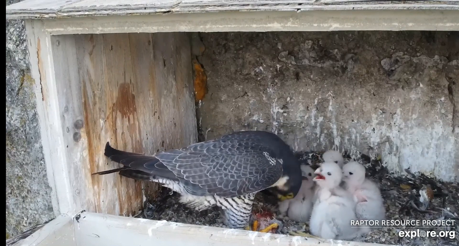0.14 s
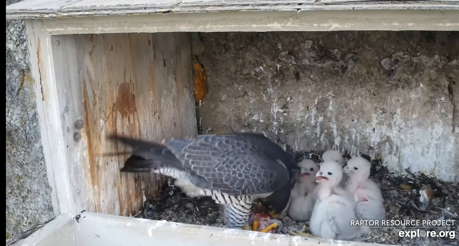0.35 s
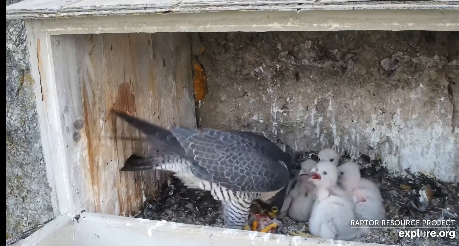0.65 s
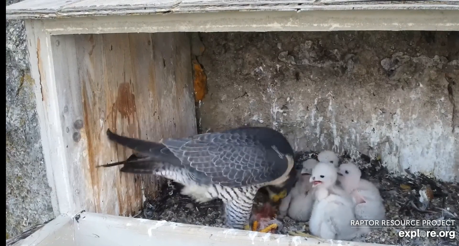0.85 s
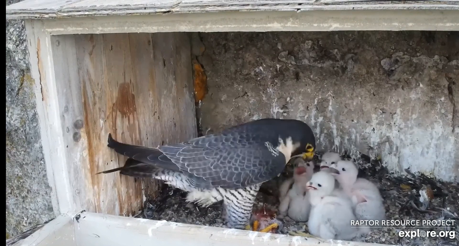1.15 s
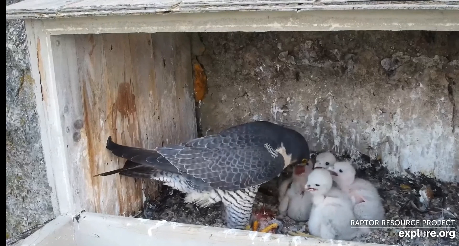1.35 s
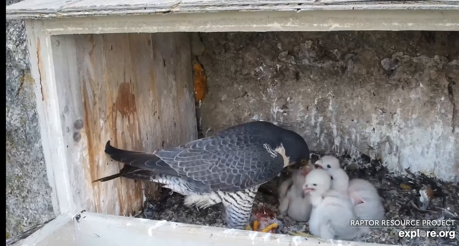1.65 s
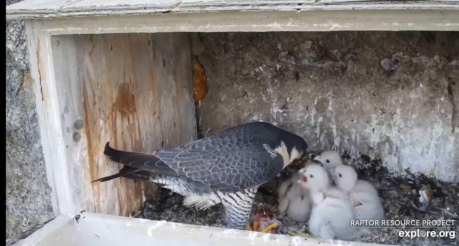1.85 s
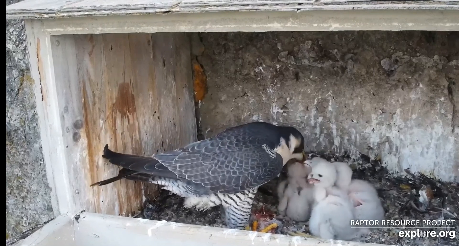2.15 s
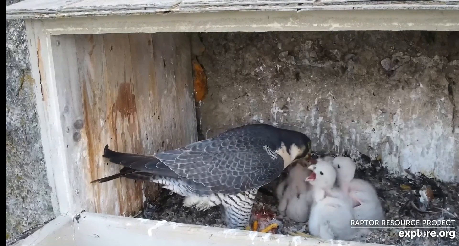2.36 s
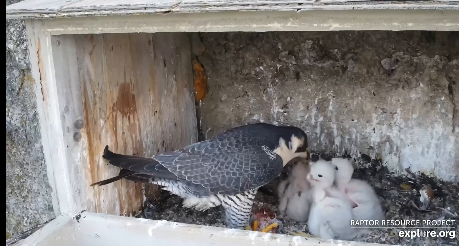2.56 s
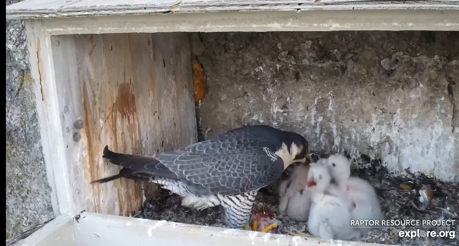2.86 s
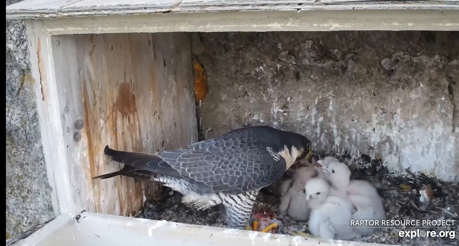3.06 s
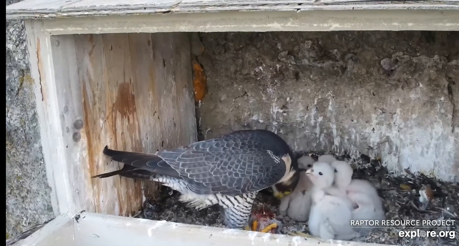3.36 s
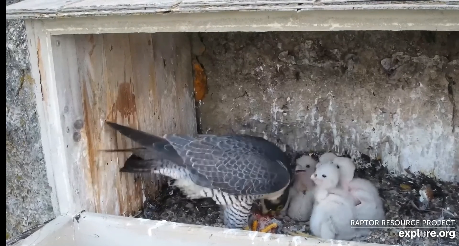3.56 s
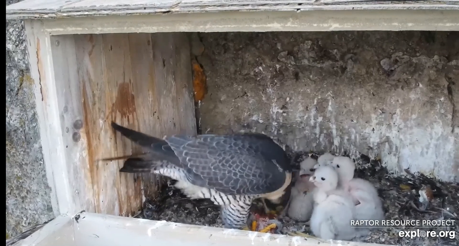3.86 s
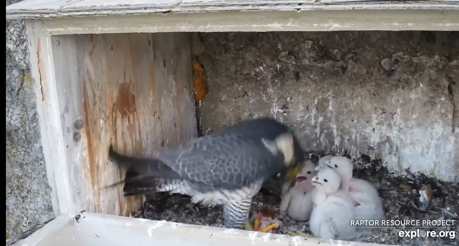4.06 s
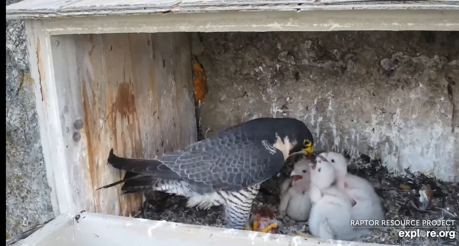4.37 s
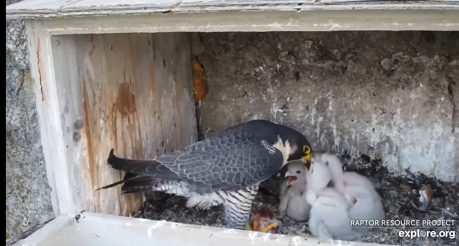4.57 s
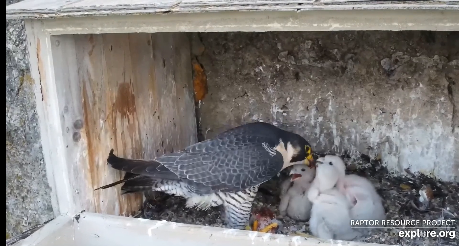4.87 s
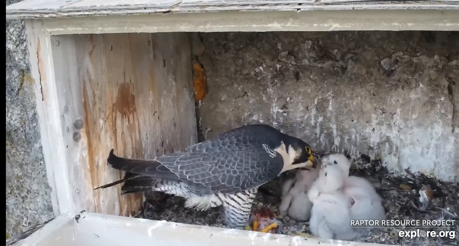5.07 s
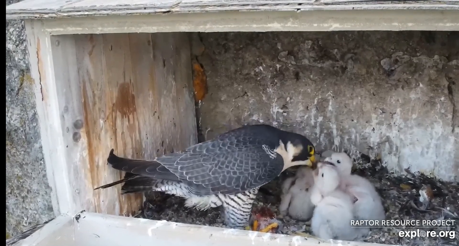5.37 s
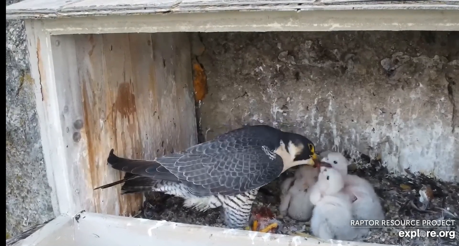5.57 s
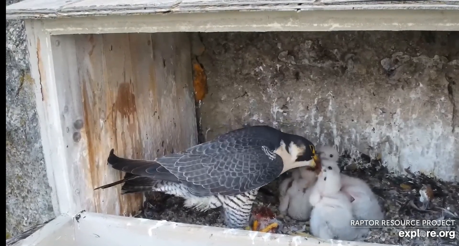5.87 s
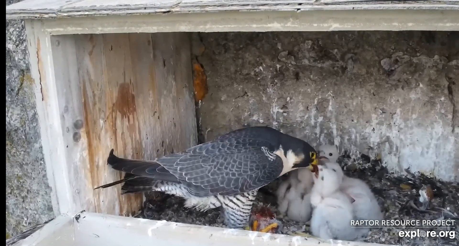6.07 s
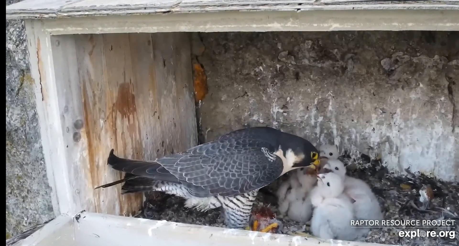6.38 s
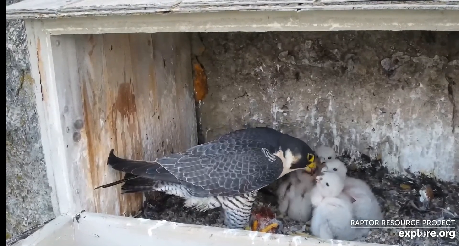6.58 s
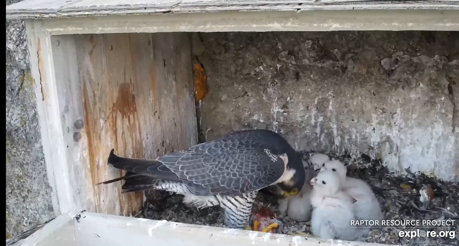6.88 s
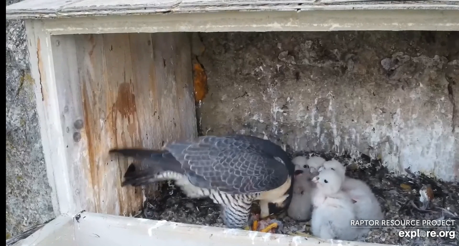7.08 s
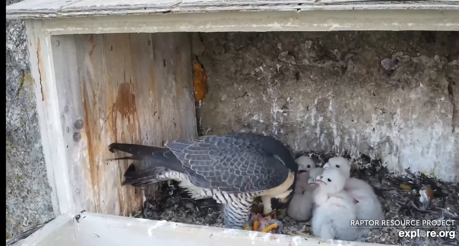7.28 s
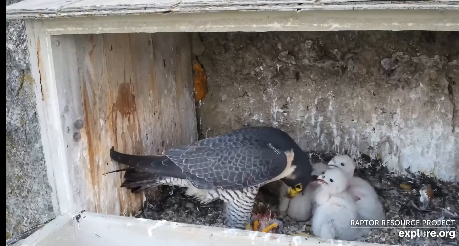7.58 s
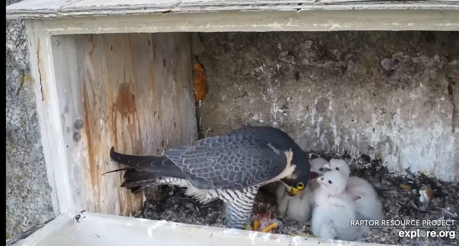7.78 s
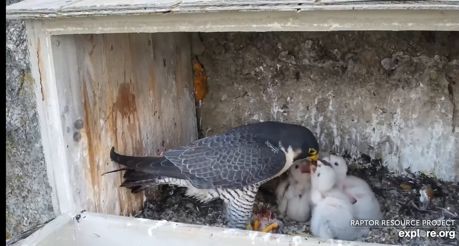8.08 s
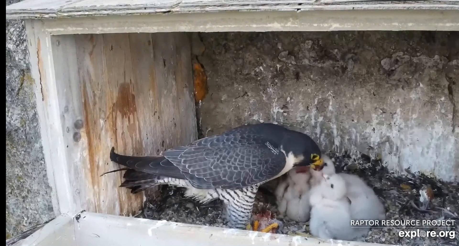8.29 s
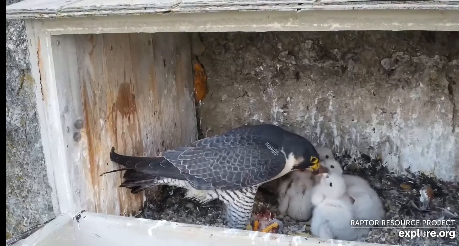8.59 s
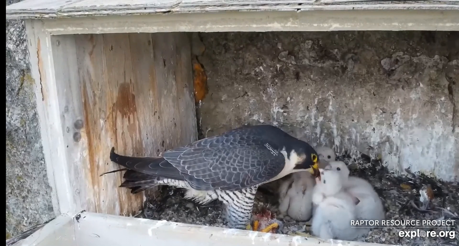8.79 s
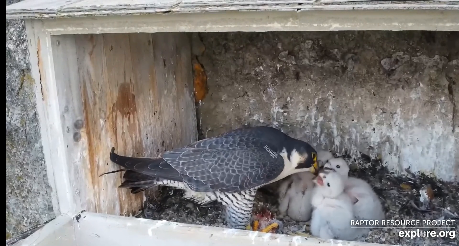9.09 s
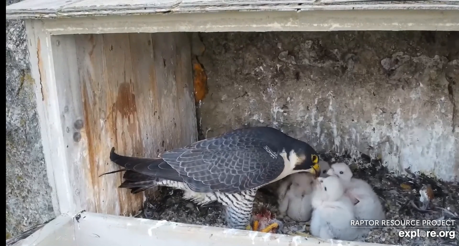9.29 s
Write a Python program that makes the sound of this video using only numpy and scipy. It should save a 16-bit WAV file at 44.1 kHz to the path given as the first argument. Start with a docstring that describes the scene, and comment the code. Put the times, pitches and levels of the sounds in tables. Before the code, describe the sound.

Close up in a small nest box of wood and concrete, a brood of falcon chicks keeps up a rapid chorus of begging calls. Thin, quavering squeals slide in pitch and crack into rough squawks, mixed with bursts of hoarse screeching. A single sharp beak snap cuts through near the middle. The walls give the calls a boxy colour, while far machines rumble and hum steadily outside.

```python
"""Clear squeals and hoarse screeching, close up: four falcon chicks beg while a parent feeds them. One mono
microphone at a small concrete and wood nest box, whose walls colour and echo the calls. The chicks' throat
membranes beat regularly in a squeal and chaotically when overblown. The parent's beak snaps twice, first
faintly, then loudly. Outside, distant machinery drones with a faint hum."""
import sys
import numpy as np
from scipy import signal
from scipy.fft import rfft, irfft
from scipy.io import wavfile
from scipy.ndimage import uniform_filter1d

SR = 44100
rng = np.random.default_rng(int(sys.argv[2]) if len(sys.argv) > 2 else 0)


def generate_wav(signal):
    """Clip the signal to [-1, 1] and save it as 16-bit WAV at the path in sys.argv[1]."""
    frames = np.transpose(np.atleast_2d(signal))
    scaled = np.clip(frames, -1, 1) * 32767
    pcm = np.round(scaled).astype(np.int16)
    wavfile.write(sys.argv[1], SR, pcm)


N = 416744

THIN_HZ, THIN_DB_PER_OCTAVE = 1274, 29  # below this pitch the small throat weakens the fundamental
SLAP_HZ, SLAP_DB_PER_OCTAVE = 1355, 33  # below this pitch slack membranes slap, rich in overtones
# Clear squeals, near the microphone: start t/s, length t/s, onset f/Hz, held from f/Hz, held to f/Hz,
# end f/Hz, first level/dB, middle level/dB, last level/dB, relative overtone level/dB
SQUEALS = [(0,0.23,2665,2620,2947,2320,-40,-30.5,-34.5,-8),(0.089,0.0767,2950,3050,3050,2830,-42,-25,-18.5,-14),
           (0.193,0.49,1050,2120,1770,1680,-26,-36,-20,-19.5),
           (0.261,0.19,2250,2300,3000,2460,-36,-44,-33,-9),(0.364,0.13,2250,2260,2050,2010,-32.5,-32,-35.5,-19),
           (0.57,0.13,1876,1950,1430,1470,-20.5,-17,-13.5,-22),(0.646,0.36,1700,1790,1690,1009,-26,-21,-21,-21.5),
           (1.029,0.014,1880,1920,2300,2350,-21.5,-23,-28,-35),
           (1.039,0.16,980,1444,2240,2165,-31,-23.5,-31,-21),(1.193,0.079,2190,2190,1970,1990,-28.5,-36.5,-35,-30),
           (1.196,0.086,1080,1680,1700,1710,-20,-35,-28.5,-26),(1.599,0.31,2060,2040,2020,2040,-38.5,-29,-44.5,-8),
           (1.845,0.092,2963,3110,3057,3070,-25,-24.5,-31,-18.5),(1.847,0.17,2590,2693,2610,2720,-33,-20,-36.5,-8),(1.984,0.082,1600,1720,1700,1206,-27,-22.5,-18.5,-20),
           (2.015,0.25,1910,1910,2010,1930,-24,-26,-32,-13),(2.156,0.044,1802,1765,1444,1264,-21,-19.5,-29,-10.5),
           (2.247,0.15,1920,1990,1880,1860,-28.5,-29,-28,-23),(2.302,0.082,1188,1730,1720,1690,-19.5,-36,-23.5,-22),
           (2.389,0.15,1930,2150,2050,1146,-30,-30.5,-19.5,-26.5),
           (2.533,0.0517,1198,1900,2055,2057,-21,-27.5,-32,-15.5),(2.595,0.42,3090,3080,3050,2900,-35.5,-36,-31.5,-29),(2.788,0.232,1800,1905,1797,1704,-33,-28.5,-22.5,-16.5),
           (3.016,0.1,1750,2350,1760,1780,-24,-27,-25,-10.5),(3.101,0.082,1800,1800,1730,1120,-22,-24,-20,-19),
           (3.231,0.094,1780,1900,2200,1797,-29.5,-41,-22,-19.5),
           (3.322,0.17,1800,2550,1950,1650,-24,-45,-25,-16),(3.406,0.16,1060,1740,1780,1510,-22,-32.5,-31.5,-16.5),
           (3.48,0.58,2800,3110,3110,2750,-44.5,-34.5,-34.5,-40.5),
           (3.819,0.37,2240,2230,2180,2189,-48.5,-39.5,-33,-19.5),
           (4.021,0.14,1786,1850,1650,1125,-20.5,-25,-18,-18),(4.17,.08,1846,2150,1900,1560,-22.5,-45,-24.5,-30),
           (4.244,0.16,2087,2080,2230,1756,-45,-44,-17,-24.5),(4.384,0.27,1778,2240,2010,2030,-22.5,-31.5,-34,-11.5),
           (4.406,0.038,1666,1680,1780,1762,-31.5,-28.5,-29,-20.5),(4.497,0.67,2912,3190,3270,2864,-30,-35,-30,-14),
           (4.56,0.28,2590,2714,2724,2630,-34.5,-31,-34,-11),(4.719,0.37,2248,2280,2150,2116,-32,-33,-34,-17),(4.802,0.28,1790,1920,1960,1221,-33.5,-29,-21,-33),
           (5.07,0.25,1960,1990,1800,1080,-30,-27.5,-22,-11),(5.203,0.082,2215,2230,2250,1460,-31.5,-31,-33,-10),
           (5.326,0.073,1024,1030,1700,1690,-34,-27,-22,-13),(5.407,0.23,1840,1900,2260,2286,-33.5,-44.5,-32.5,-16.5),
           (5.486,.16,2930,3330,3150,2870,-32,-32.5,-26.5,-21),(5.56,0.099,1030,1900,1820,1830,-21.5,-31,-27,-11.5),
           (5.653,0.068,2970,2960,3100,3114,-33,-26,-25.5,-26.5),(5.801,0.023,1790,1790,1410,1380,-20,-21.5,-21,-33),
           (5.93,0.21,2105,2096,2240,2257,-37,-41,-33,-3.5),
           (6.168,0.033,1764,1730,1620,1610,-18,-26.5,-17.5,-20.5),(6.171,0.088,2774,2790,2800,2405,-34,-21.5,-30,-14),
           (6.185,0.2,1750,2140,1864,1123,-32,-27,-15,-15),
           (6.31,0.16,3350,3500,3600,3486,-35,-32,-36,-38),(6.388,0.1,2250,1900,2095,1500,-28,-32.5,-22,-41),
           (6.497,0.21,1550,1830,1920,1976,-24.5,-28,-29.5,-39),(6.571,0.023,1738,1720,1420,1387,-28.5,-19.5,-14,-16),
           (6.588,0.11,1423,1760,1700,1752,-23,-21.5,-16.5,-19.5),(6.65,0.4,3110,3000,3230,2845,-33,-34,-37.5,-21),
           (6.594,0.22,1860,2050,1850,1800,-31,-26,-29,-20),(6.777,0.085,1756,1500,1555,1396,-21,-16.5,-17.5,-11),
           (6.876,0.064,2620,2680,2150,1945,-32.5,-33.5,-29,-8),(7.006,0.19,1906,1880,1960,1099,-27.5,-27.5,-17,-10.5),
           (7.206,0.26,2640,2610,2480,2520,-42.5,-37.5,-37.5,-4.5),
           (7.419,0.08,1050,1700,1750,1743,-21,-36,-37,-13),(7.447,0.19,1958,2150,2230,1980,-32,-33,-20,-25),
           (7.488,0.29,2760,2790,3192,3050,-33,-34.5,-30,-18.5),(7.622,0.094,1972,2090,2050,1958,-25.5,-21.5,-16,-23),
           (7.627,0.052,1918,1914,1490,1360,-21,-22.5,-24,-10.5),
           (7.708,0.21,1970,2300,1830,1816,-25,-23.5,-16,-20),(7.998,0.0633,1782,1750,1650,1654,-25,-20,-14,-10.5),
           (8.059,0.12,1650,1780,1780,1771,-15,-19,-18,-10.5),(8.167,0.44,1782,1880,1991,1200,-27.5,-29.5,-23,-8.5),
           (8.175,.14,1782,1560,1454,1296,-22,-19.5,-31,-5.5),(8.368,0.1,2970,2960,3080,3147,-36,-28,-22,-17),(8.449,0.24,3465,3500,3330,2710,-35,-33.5,-33,-20),
           (8.561,0.335,2150,2070,2045,1340,-38,-29,-20,-14),(8.769,0.032,1738,1730,1310,1310,-20.5,-18,-23,-29),
           (8.8,0.25,1280,1740,1580,1259,-22,-20.5,-25,-10.5),(8.922,0.49,2066,2130,2260,1976,-34.5,-29,-32.5,-15.5),
           (9.189,0.03,1130,1130,1640,1638,-33.5,-24.5,-12,-13.5)]


def squeals():
    """Clear calls: a quavering glide that cracks into a rough squawk when it slides fast or gets loud."""
    tones, overtones = np.zeros(N), np.zeros(N)
    for start, length, *glide_hz, first_db, middle_db, last_db, overtone_db in SQUEALS:
        span = np.arange(max(int(start * SR), 0), min(int((start + length) * SR), N))
        age, count = span / SR - start, len(span)
        pitch = uniform_filter1d(glide(age, length, *glide_hz), int(.014 * SR), mode="nearest")
        quaver = .00809 * walk(45, count) + .011 * walk(19, count)
        pitch = pitch * (1 + np.sin(np.pi * age / length) * quaver)
        loud_db = np.interp(age / length, [0, .5, 1], [first_db, middle_db, last_db])
        thin_db = THIN_DB_PER_OCTAVE * np.maximum(np.log2(THIN_HZ / pitch), 0)
        slap_db = SLAP_DB_PER_OCTAVE * np.maximum(np.log2(SLAP_HZ / pitch), 0)
        # slackening or strained membranes lose their regular beat
        slide = np.gradient(np.log(uniform_filter1d(pitch, int(.016 * SR), mode="nearest"))) * SR
        slip = np.clip(np.maximum(-slide / 4.4, slide / 18), 0, 1) ** 2
        strain = np.clip((loud_db + 23) / 18, 0, 1)
        crack = np.maximum(slip, strain)
        rough_hz = pitch * (1 + (.0059 + .038 * crack) * walk(1500, count))
        edge = np.clip(np.minimum(age / .0022, (length - age) / .0036), 0, 1)
        gain = edge * undb(loud_db + (1.5 + .19 * crack) * walk(139.6, count))
        # the fundamental swells more than its overtones do
        bright_db = overtone_db - .24 * (loud_db - loud_db.mean()) + slap_db
        tone, upper = syrinx(rough_hz, fall_db=-7.5 + .32 * slap_db, patchy_db=5.8)
        sidebands = flutter(pitch / 6, depth=np.clip(-.45 + .49 * walk(2.7, count), 0, 2))
        # a loud cry that sags in pitch rasps: its overtones shatter into noisy bands
        rasp = np.clip(-slide - 1.7, 0, 1) * np.clip((loud_db + 24) / 5, 0, 1)
        shatter = 1 - rasp + 1.3 * rasp * walk(900, count)
        tones[span] += gain * undb(-thin_db) * tone
        overtones[span] += gain * undb(bright_db) * upper * sidebands * shatter
    return tones + overtones + undb(-7.5) * box_walls(overtones)


def glide(age, length, onset_hz, from_hz, to_hz, end_hz):
    """Pitch of a squeal: a scoop into a straight held glide, then a bend to the end pitch."""
    scoop_s, bend_s = .012 + .1 * length, .015 + .06 * length
    held = from_hz + (to_hz - from_hz) * age / length
    scoop = (onset_hz - from_hz) * np.exp(-age / scoop_s)
    bend = (end_hz - to_hz) * np.exp((age - length) / bend_s)
    return held + scoop + bend


# Three hoarse throats in the box: mean f/Hz, pitch chaos/ratio, relative level/dB,
# flutter f/Hz, flutter depth/ratio, overtone offset level/dB
THROATS = [(1459, .06, -4, 370, 1.54, -3.5), (1769, 0.03107, -6, 300, 0.6, 0),
           (1655, 0.01613, -7.5, 380, 0.79, 1.5)]


def screech():
    """Overblown membranes: pitch and size of the beat jump chaotically under a slower flutter."""
    coarse = np.arange(0, N, 32)
    low_db, high_db = (np.interp(np.arange(N), coarse, db) for db in hoarse_levels(coarse / SR))
    # the harder the chicks blow, the less regular the beat
    effort = np.clip((np.maximum(low_db, high_db) + 36) / 9, .4, 1)
    voices = 0
    for hz, chaos, throat_db, flutter_hz, depth, overtone_db in THROATS:
        drift = 1 + .035 * walk(5, N) + .02 * walk(25, N)
        jitter = effort * chaos * undb(3.994 * walk(12, N)) * walk(2500, N)
        tone, upper = syrinx(hz * (drift + jitter), fall_db=-3, patchy_db=1.3)
        size = undb(throat_db + 3.91 * effort * walk(600, N)) * flutter(flutter_hz * drift, depth)
        bright_db = high_db - low_db + overtone_db + 2.25 * walk(15, N)
        voices = voices + size * (tone + undb(bright_db) * upper)
    return box_walls(voices * undb(low_db))


SWELL_DB_PER_S, FADE_DB_PER_S = 408, 393.5  # before and after each cry
MUTTER_DB, MUTTER_OVERTONES_DB = -63, -31  # hoarse muttering between the cries
# Hoarse cries, near the microphone: start t/s, length t/s, first level/dB, last level/dB,
# first and last relative overtone level/dB
HOARSE_CRIES = [(0,0.12,-44,-43,10.5,12),(0.199,0.088,-34.5,-26,-24,-17),(0.378,0.057,-42.5,-44,9.5,-2),(0.45,0.17,-38,-19.5,-10,-28.5),
                (0.627,0.096,-30,-27,-9,-8),(0.739,.2,-30.5,-34,-17,-17),(0.974,.19,-26.5,-29,-14,-18),(1.211,0.026,-29.5,-29,2.5,-24),(1.248,0.75,-27.5,-18.5,-5.5,-10.5),
                (2.167,0.045,-30,-31.5,-14,3.5),(2.298,0.2,-23.5,-33,-6,-13),(2.568,0.082,-30,-23.5,-1.5,-3.5),(2.669,0.13,-24,-23.5,-5,-16),
                (2.833,0.13,-36.5,-39.5,2,9),(3.159,0.013,-32.5,-24,-12.5,-17),(3.423,0.24,-34,-30,-13,-7.5),
                (3.682,0.32,-35,-20,-2.5,-9.5),(4.134,0.0225,-13.5,-21,-11,-7),(4.385,0.012,-22,-20,-9,-16.5),(4.445,0.15,-23,-29,-6,2.5),
                (4.623,0.5,-30,-28,1,-0.5),(5.449,0.21,-48,-29.5,5,-2),(5.69,0.48,-28.5,-21.5,-4,-4.5),
                (6.199,0.1,-32.5,-46.5,8,18.5),(6.364,0.024,-19.5,-21.5,-9,-10.5),(6.599,0.14,-23.5,-17,-7.5,-16),(6.779,0.11,-25,-22.5,-13.5,-7.5),(6.932,0.069,-18.5,-20,-12,-14.5),
                (7.169,0.014,-23,-26,-25,-4),(7.223,0.16,-37,-44.5,-4,9),(7.433,0.1834,-24,-29,-12,-2),(7.632,0.054,-26,-25,-8,-6),
                (7.741,0.19,-24.5,-22.5,-7,-2.5),(7.904,0.42,-15.5,-26.5,-8.5,0),(8.33,0.16,-41.5,-39.5,7,16),(8.57,0.19,-21.5,-33,-9,-2.5),
                (8.797,0.11,-30.5,-22,-9.5,-6),(9.044,0.15,-38,-27,0,-2.5),(9.216,0.29,-29.5,-22.5,-2,-10.5)]


def hoarse_levels(t):
    """Cries and muttering add in power: level/dB of the fundamental and of the overtones."""
    low, high = undb(MUTTER_DB) ** 2, undb(MUTTER_DB + MUTTER_OVERTONES_DB) ** 2
    for start, length, first_db, last_db, first_over_db, last_over_db in HOARSE_CRIES:
        progress = np.clip((t - start) / length, 0, 1)
        db = first_db + (last_db - first_db) * progress
        db -= SWELL_DB_PER_S * np.maximum(start - t, 0)
        db -= FADE_DB_PER_S * np.maximum(t - start - length, 0)
        low = low + undb(db) ** 2
        high = high + undb(db + first_over_db + (last_over_db - first_over_db) * progress) ** 2
    return 10 * np.log10(low), 10 * np.log10(high)


def syrinx(hz, fall_db, patchy_db):
    """Membrane tone of rms 1, and its overtones, which step by fall_db and each come and go."""
    turn = np.exp(2j * np.pi * np.cumsum(hz) / SR)
    overtones, harmonic = 0, turn
    for k in range(2, 11):
        harmonic = harmonic * turn
        gain = undb(fall_db * (k - 2) + patchy_db * np.tanh(walk(14, len(hz))))
        overtones = overtones + gain * (k * hz < TOP_HZ) * harmonic.imag
    return np.sqrt(2) * turn.imag, np.sqrt(2) * overtones


def flutter(hz, depth):
    """A second, slower membrane squeezes the tone and splits each harmonic into sidebands."""
    phase = 2 * np.pi * np.cumsum(hz) / SR
    return (1 + depth * (np.cos(phase) + .101 * np.sin(2 * phase))) / np.sqrt(1 + depth ** 2)


# The parent's beak and feet, inside the box: t/s, snap level/dB, thump level/dB
TAPS = [(3.98, -40, -22.5), (4.19, -1, -1.5)]


def taps():
    """A dry snap of the beak with a dull thump in the box floor and a thin rustle after it."""
    out, t = np.zeros(N), np.arange(int(.1 * SR)) / SR
    for start, snap_db, thump_db in TAPS:
        burst = rng.standard_normal(len(t)) * (t / .0035) * np.exp(-t / .0021)
        snap = resonance(burst, hz=3400, width=3680)
        thump = np.sin(2 * np.pi * 260 * t) * (t / .0025) ** 2 * np.exp(-t / .0013)
        rustle = np.diff(rng.standard_normal(len(t) + 2), 2) * np.exp(-((t - .05) / .024) ** 2)
        i = int(start * SR)
        out[i:i + len(t)] += undb(snap_db) * (snap + undb(-51.5) * rustle) + undb(thump_db) * thump
    return out


# Resonances of the box around the birds: centre f/Hz, width per filter pass f/Hz, level/dB
BOX_RESONANCES = [(1486, 435, -0.5), (1743, 374, 1), (2076, 127, 4.5), (2241, 234, 8.5), (2648, 600, 1),
                  (3198, 1390, 2), (3883, 900, 0), (4356, 770, 6.5), (4812, 695, 3), (5285, 900, 0),
                  (6030, 890, 2), (6840, 760, 0.5), (7387, 840, -4), (8400, 4000, -6.5)]


def box_walls(x):
    """The walls favour their own notes and leave dark gaps between them."""
    notes = (undb(db) * resonance(resonance(x, hz, width), hz, width) for hz, width, db in BOX_RESONANCES)
    return sum(notes) + undb(-17) * x


def box_echo(x, t60_s=.014):
    """Close walls return a short, dense echo, starting 2 ms after the direct sound."""
    t = np.arange(int(.2 * SR)) / SR
    echo = rng.standard_normal(len(t)) * np.exp(-np.log(1000) * t / t60_s) * (t > .002)
    return signal.fftconvolve(x, echo / np.sqrt(np.sum(echo ** 2)))[:N]


DRONE_DB, HUM_DB, HUM_HZ, HUM_GROWTH_DB_PER_S = -31.5, -53, 88.4, 1
# Spectrum of the machinery, far outside the box: f/Hz, relative level/dB
DRONE_SPECTRUM = [(41, -44), (70, -17), (148, -8), (300, 6), (570, -17.5), (1250, -3), (2020, -9.5),
                  (2660, -17.5), (6020, -31.5), (16000, -42.5)]


def machinery():
    """Distant machines: a steady rumble and a wavering hum that slowly grows."""
    hz, db = np.transpose(DRONE_SPECTRUM)
    bin_hz = np.maximum(np.arange(N // 2 + 1) * SR / N, 1)
    colour = undb(np.interp(np.log(bin_hz), np.log(hz), db))
    rumble = irfft(rfft(rng.standard_normal(N)) * colour, N)
    hum = np.sin(2 * np.pi * np.cumsum(HUM_HZ * (1 + .0351 * walk(21, N))) / SR)
    growth = undb(HUM_GROWTH_DB_PER_S * np.arange(N) / SR)
    return level(rumble, DRONE_DB) + level(hum * growth, HUM_DB)


def undb(db):
    """Decibels to gain."""
    return 10 ** (np.asarray(db) / 20)


def level(x, db):
    """Scale to an rms level."""
    return x * undb(db) / np.sqrt(np.mean(x ** 2))


def resonance(x, hz, width):
    """Two-pole band-pass, gain 1 at the centre."""
    return signal.lfilter(*signal.iirpeak(hz, hz / width, SR), x)


def walk(rate_hz, count):
    """Smooth random wobble, spread near 1."""
    hold = max(int(SR / rate_hz), 2)
    steps = np.repeat(rng.standard_normal(count // hold + 1), hold)[:count]
    return 1.4 * uniform_filter1d(uniform_filter1d(steps, hold), hold)


def scene():
    """Birds close by, their echo and the far machinery, the same in both channels."""
    birds = squeals() + screech() + taps()
    mono = birds + undb(-4) * box_echo(birds) + machinery()
    return np.array([mono, mono])


LOW_HZ, TOP_HZ = 79, 15900  # the microphone's band


def record(dry):
    """The microphone drops the deep bass, rounds the loudest peaks and cuts the top steeply."""
    thin = signal.sosfilt(signal.butter(8, LOW_HZ, "high", fs=SR, output="sos"), dry)
    rounded = np.tanh(1.166 * thin) / 1.044
    return signal.sosfilt(signal.ellip(10, .2, 80, TOP_HZ, fs=SR, output="sos"), rounded)


dry = scene()
out = record(dry)
generate_wav(out)
```